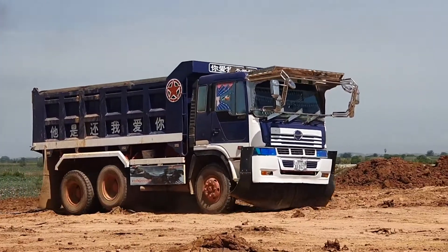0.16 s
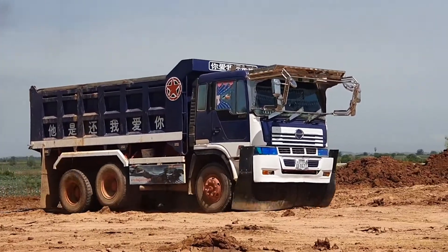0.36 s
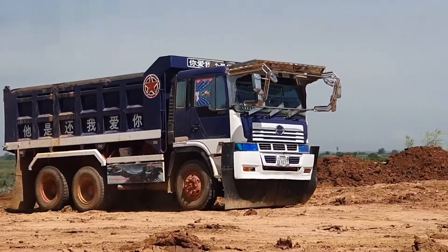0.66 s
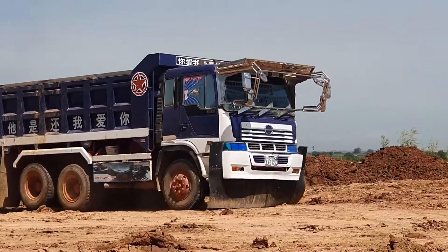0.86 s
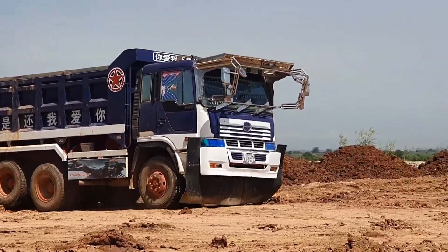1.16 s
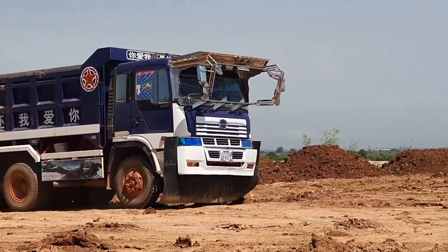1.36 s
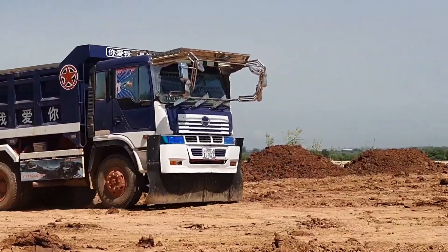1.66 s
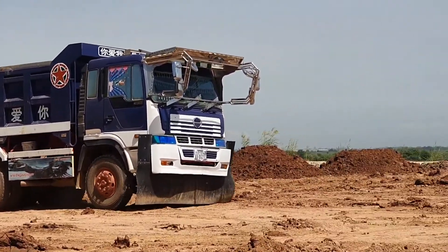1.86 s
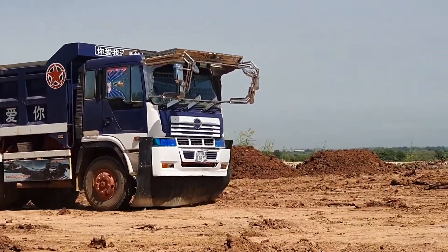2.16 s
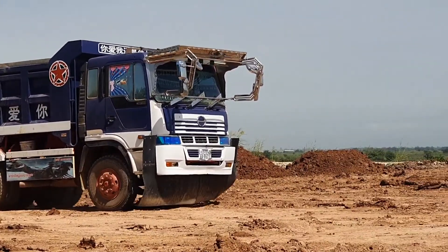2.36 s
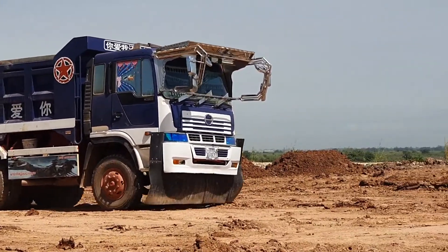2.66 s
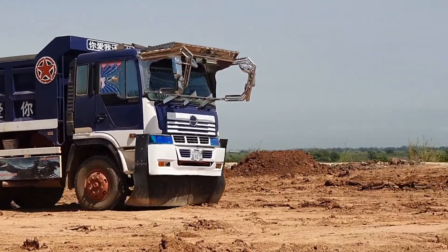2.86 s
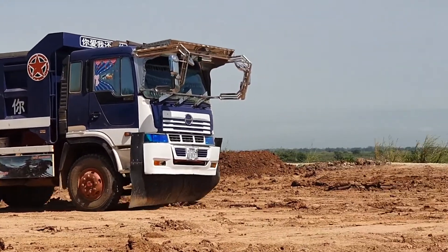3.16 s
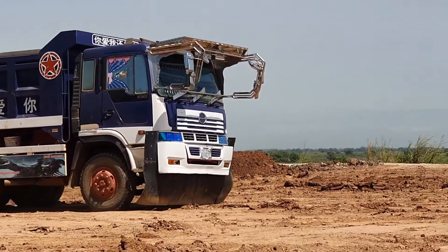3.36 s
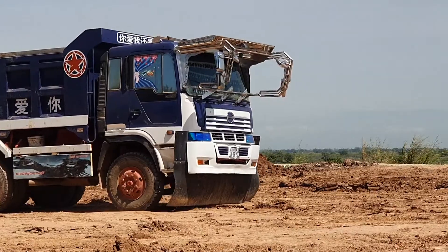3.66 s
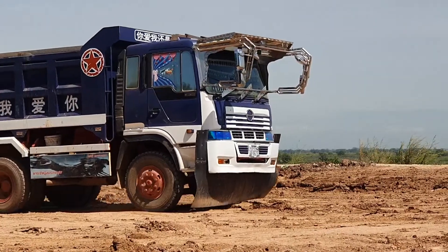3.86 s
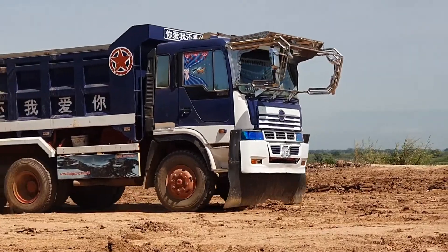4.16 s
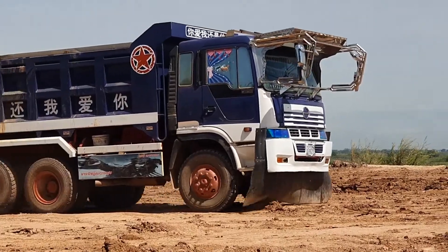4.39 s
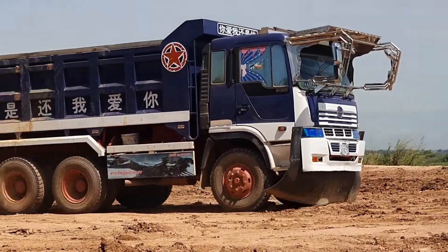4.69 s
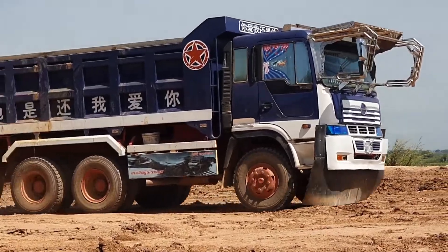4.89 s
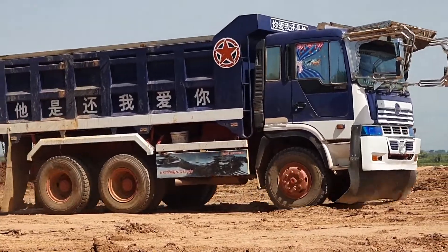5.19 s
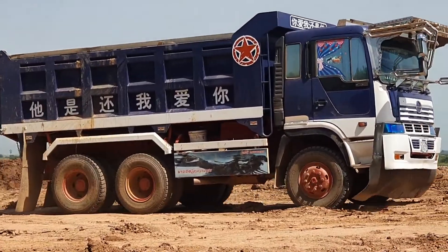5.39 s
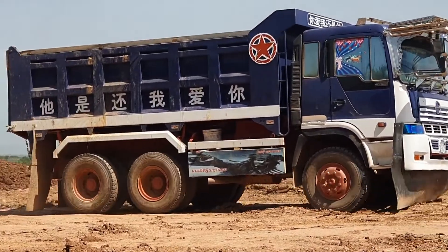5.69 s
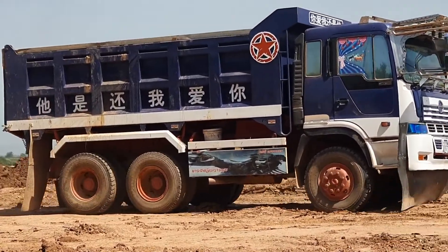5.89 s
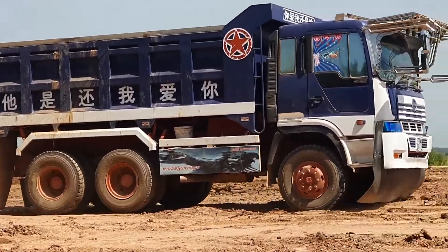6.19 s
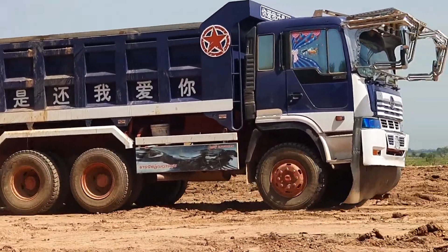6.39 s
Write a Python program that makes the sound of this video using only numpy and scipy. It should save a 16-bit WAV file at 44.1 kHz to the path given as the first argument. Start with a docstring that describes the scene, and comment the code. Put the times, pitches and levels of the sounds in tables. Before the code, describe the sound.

Outdoors on open dirt, two close microphones pick up heavy diesel machinery without noticeable echo. From 0 to about 3.9 s a bulldozer on the left drones under load, a strong, low, nearly steady hum wrapped in rough exhaust roar, mid-range clatter and soft fan hiss. Thin metallic track squeaks chirp near the start, then around 1.8-3 s, with a few knocks from 2.4 s. A dump truck's quieter low-gear growl wavers underneath, gradually rising and gaining a faint gear whine after 3 s. Near 4 s the bulldozer's throttle closes amid bright squeaks and a knock; its hum drops and slides down, with a faint falling whine, leaving the truck's lumpy, loping exhaust clearer. Drawn-out squeaks come near 4.7 s. About 5.6 s the bulldozer catches and revs upward, its drone returning by 6.3 s beside final squeaks, with both engines still running at the end.

```python
"""A six-cylinder bulldozer drones under load to the left, shuts its throttle, coasts and revs again.
Its exhaust is a strong firing tone with weak cycle tones; its track links squeak (stick-slip tones) and knock
(noise bursts). An eight-cylinder dump truck crawls closer over dirt in low gear: loping cycle tones, whining gears.
Pulsed noise, with brief narrow-band flecks, gives both machines their roar, clatter and fan hiss.
Two microphone ports hear slight time differences."""
import sys
import numpy as np
from scipy import signal
from scipy.fft import rfft, irfft, next_fast_len
from scipy.io import wavfile
from scipy.ndimage import uniform_filter1d, map_coordinates

SR = 44100
rng = np.random.default_rng(int(sys.argv[2]) if len(sys.argv) > 2 else 0)


def log_audio(samples):
    """Write samples as a 16-bit WAV file to the path given in sys.argv[1]."""
    # one column per channel
    frames = np.atleast_2d(samples).T
    # limit to full scale, then quantise
    limited = np.clip(frames, -1, 1)
    pcm = np.round(limited * 32767).astype(np.int16)
    wavfile.write(sys.argv[1], SR, pcm)


N = 288414


def amp(db):
    """Amplitude factor of a level in dB."""
    return 10 ** (np.asarray(db) / 20)


def unit(x):
    """x scaled to rms 1."""
    return x / np.sqrt(np.mean(x ** 2) + 1e-20)


def along(points, hz):
    """Interpolates (Hz, value) points on a log frequency axis."""
    point_hz, values = np.transpose(points)
    return np.interp(np.log(hz + 1), np.log(point_hz + 1), values)


def curves(rows):
    """One value per sample for each column after the time in seconds."""
    s, *columns = np.transpose(rows)
    return [np.interp(np.arange(N) / SR, s, column) for column in columns]


def wobble(knots_per_s):
    """A smooth random curve through normally distributed knots."""
    knots = rng.standard_normal(int(N * knots_per_s / SR) + 4)
    return map_coordinates(knots, [np.arange(N) * knots_per_s / SR])


def filtered(x, response):
    """x with its spectrum multiplied by a response of frequency."""
    m = next_fast_len(N + 8192)
    return irfft(rfft(x, m) * response(np.fft.rfftfreq(m, 1 / SR)), m)[..., :N]


def tone(phase, db, waver_db, knots_per_s, scatter_rad=np.pi):
    """A sine of rms level db wavering in size, its start phase scattered by about scatter_rad."""
    level = np.sqrt(2) * amp(db + waver_db * wobble(knots_per_s))
    return level * np.cos(phase + scatter_rad * rng.uniform(-1.04, 1))


def turning(firing_hz, cylinders):
    """Phase of the four-stroke cycle, in which each cylinder fires once."""
    return 2 * np.pi * np.cumsum(firing_hz) / SR / cylinders


def scratch(hz, half_width_octaves, size):
    """Short noise of rms 1 in a band around hz."""
    low_hz = hz / 2 ** half_width_octaves
    high_hz = min(hz * 2 ** half_width_octaves, SR / 2.2)
    band = signal.butter(2, [low_hz, high_hz], "bandpass", fs=SR)
    return unit(signal.lfilter(*band, rng.standard_normal(size)))


def heard(x, lead_s):
    """Both ports, the left one earlier by lead_s."""
    n = np.arange(N)
    return np.array([map_coordinates(x, [n + side * lead_s * SR / 2], mode="nearest") for side in (1, -1)])


def dozer_exhaust():
    """Regular firing gives a strong tone and its octave, unequal cylinders weak cycle tones; a whine shows on coasting."""
    # Held by the governor, throttle shut, coasting, revving. Each row: time in s, firing rate in Hz, firing tone in dB
    throttle = [(0.0, 83.44, -16), (0.6, 84.3, -17), (0.95, 82.85, -16), (1.8, 82.57, -16),
                (2.05, 84.2, -15.5), (2.3, 83.15, -16.5), (3.0, 84.2, -16.5), (3.3, 86.1, -16.8),
                (3.62, 85.7, -18), (3.87, 84.32, -19.5), (3.97, 83.06, -33), (4.1, 77.9, -42),
                (4.6, 64.2, -60), (5.2, 49.6, -52), (5.58, 40.85, -40), (5.68, 43.9, -26.5),
                (5.83, 52.2, -22.5), (6.14, 67.75, -22), (6.28, 72.94, -16), (6.54, 80.5, -18)]
    # Tones from unequal cylinders. Each row: multiple of the cycle rate, level in dB re firing tone
    orders = [(5, -52), (7, -44), (8, -23.5), (10, -31), (14, -25), (15, -34.5), (16, -26.5), (17, -29),
              (18, -22.5), (20, -41), (22, -34)]
    # The pipe favours a low octave. Each row: octave frequency in Hz, level in dB re firing tone
    octave = [(80, -4), (122, -3.5), (134, -24), (155, -36), (165, -20)]
    # Whine, heard only while coasting. Each row: time in s, level in dB
    rundown = [(4.0, -85), (4.12, -63), (4.55, -65), (4.67, -52), (4.85, -61), (5.0, -55), (5.15, -62),
               (5.3, -90)]
    whine_per_firing = 20.6  # pitch ratio

    hz, db = curves(throttle)
    cycle = turning(hz, cylinders=6)
    # gaining speed takes more fuel, which sharpens the exhaust pulses
    gain_hz_per_s = uniform_filter1d(np.gradient(hz) * SR, size=4000)
    strain_db = 0.13 * np.clip(gain_hz_per_s - 8, 0, 60)
    firing = tone(6 * cycle, db, 0.21, 13)
    overtones = tone(12 * cycle, db + along(octave, 2 * hz), 2.65, 5)
    overtones += sum(tone(k * cycle, db + level_db + strain_db, 0.93, 4.04) for k, level_db in orders)
    whine_db, = curves(rundown)
    whine_hz = whine_per_firing * hz + 4 * wobble(30)
    whine = tone(2 * np.pi * np.cumsum(whine_hz) / SR, whine_db, 2, 12)
    return firing, overtones, whine, cycle


def truck_exhaust():
    """The firing tone beats against cycle tones of uneven banks, a lope; two gear pairs whine unsteadily."""
    # Surging over ruts. Each row: time in s, firing rate in Hz, firing tone in dB
    surging = [(0.0, 52.4, -48.5), (0.3, 53.4, -33), (0.64, 50, -37), (0.9, 57, -29), (1.15, 51.5, -36),
               (1.55, 52.3, -33.5), (1.8, 55, -30.5), (2.25, 53.6, -29), (2.56, 63.07, -28.5),
               (2.88, 57.46, -31), (3.25, 66, -27.5), (3.6, 65.53, -29), (4.0, 69.34, -27.5),
               (4.2, 66.86, -29), (4.55, 71.1, -26), (4.82, 66.94, -27), (5.15, 71.46, -24),
               (5.55, 67.47, -23.5), (5.9, 65.32, -24), (6.2, 65.1, -26), (6.54, 60.73, -29.5)]
    # Uneven exhaust banks. Each row: multiple of the cycle rate, level in dB re firing tone before the lope
    orders = [(4, -18), (5, -9), (6, -6), (7, 0), (9, -14), (10, -10), (11, -6), (13, -5), (14, -3),
              (15, -10), (16, -9), (17, -12), (20, -12), (24, -14), (26, -14), (29, -13), (34, -14),
              (40, -16)]
    # The lope deepens as the truck pulls harder. Each row: time in s, mean gain of the cycle tones in dB
    lope = [(0, -22), (1.5, -24), (3.8, -7), (5, -8.5), (6.54, -7)]
    mesh_per_firing, second_pair_ratio = 66.3, 1.325  # pitch ratios
    gear_db, gear_full_s, gear_rise_db_per_s = -63, 3.2, 40

    hz, db = curves(surging)
    lope_db = curves(lope)[0] + 1.94 * wobble(5)
    cycle = turning(hz, cylinders=8)
    exhaust = tone(8 * cycle, db, 1.7, 6, scatter_rad=0)
    for k, level_db in orders:
        # one firing of each cycle is stronger, so the low cycle tones crest together in a lump
        scatter_rad = np.pi if k > 7 else .3
        exhaust += tone(k * cycle, db + lope_db + level_db, .8, 4, scatter_rad)
    whine_db = gear_db - gear_rise_db_per_s * np.clip(gear_full_s - np.arange(N) / SR, 0, 1)
    mesh = mesh_per_firing * 8 * cycle
    gears = tone(mesh + 1.1 * wobble(160), whine_db, 3.5, 30)
    gears += tone(second_pair_ratio * mesh + 1.4 * wobble(160), whine_db - 5, 3.5, 30)
    return exhaust, gears, cycle


def squeak(length_s, hz, beside_db):
    """A track link slipping on its pin: a ragged stick-slip tone, overtones, shoe modes and a scrape."""
    # What a pitch brings along. Each row: pitch in Hz, 2nd and 3rd harmonic in dB, flatness at the start in Hz
    pins = [(3400, -26, -29, 120), (3600, -23, -34, 30), (4300, -22, -33, 30), (5090, -2.5, -26, 0),
            (5170, -17, -15, 0), (5660, -11, -35.5, 40)]
    # Modes of the track shoe beside the pin's. Each row: offset in Hz, relative level in dB
    neighbours = [(-480, -17.5), (479, 9.5), (892, -5.5)]
    scoop_s = .012  # time constant of the slide up to pitch

    pin_hz, *extras = np.transpose(pins)
    second_db, third_db, scoop_hz = (np.interp(hz, pin_hz, column) for column in extras)
    t = np.arange(int(SR * (length_s + 0.056))) / SR
    steps = np.repeat(rng.standard_normal((5, 80)), 85, axis=1)
    flutter = uniform_filter1d(steps, size=85, axis=1)[:, :len(t)]
    pitch_hz = hz - scoop_hz * np.exp(-t / scoop_s) + 28 * flutter[0]
    phase = 2 * np.pi * np.cumsum(pitch_hz) / SR
    swell = np.sin(np.pi * np.clip(t / length_s, 0, .85)) ** .7
    shape = swell * amp(-60 * np.clip(t - 0.85 * length_s, 0, 1) / .055)
    grip = amp(3.5 * flutter[1:] - 1.5)  # comes and goes within milliseconds
    overtones = amp(second_db) * np.sin(2 * phase) + amp(third_db) * np.sin(3 * phase)
    wave = grip[0] * (np.sin(phase) + shape * overtones)
    for own_grip, (offset_hz, level_db) in zip(grip[1:], neighbours):
        # each mode catches only for part of the slip
        catch_db = 3 - 14 * (2 * t / length_s - 2 * rng.random()) ** 2
        mode = np.sin(phase + 2 * np.pi * offset_hz * t)
        wave += own_grip * amp(beside_db + level_db + catch_db) * mode
    wave += amp(-23) * scratch(hz, 0.11, size=len(t))
    wave += amp(-11.5 - 60 * t / 0.099) * scratch(hz, 0.41, size=len(t))
    return shape * wave


def noise_burst(db, hz, half_width_octaves):
    """A noise band with a 2.3 ms attack, falling 60 dB in 0.14 s, cut at 0.1 s."""
    t = np.arange(SR // 10) / SR
    envelope = amp(db - 60 * t / 0.14) * np.clip(t / 0.0023, 0, 1)
    return envelope * scratch(hz, half_width_octaves, size=len(t))


def tracks_and_flecks():
    """Track links squeak on their pins and knock in wide noise bands; narrow bands fleck the machine noise."""
    # Each row: start in s, length in s, pitch in Hz, level in dB, neighbour modes in dB, left over right in dB
    squeaks = [(0.048, 0.05, 4480, -49, -30, 5), (0.1, 0.051, 3430, -43.5, -30, 0),
               (0.348, 0.036, 5080, -47, -30, 0), (1.792, .035, 4114, -45, -30, 0),
               (2.003, 0.03, 3900, -41.5, -30, 0), (2.487, .03, 4200, -40, -30, 0.5),
               (2.597, .012, 3820, -42, -30, 3), (2.617, 0.029, 5224, -31, -30, -2),
               (2.65, 0.04, 5200, -47, -27, -1), (2.718, 0.042, 5160, -36.5, -30, 0),
               (2.744, 0.051, 5070, -40, -30, 5), (2.796, 0.026, 5430, -50, -30, 5),
               (2.95, 0.032, 5194, -34.5, -30, 2), (3.993, 0.016, 5221, -29.5, -30, 4),
               (4.008, .028, 5140, -37, -30, 6), (4.045, 0.038, 5550, -37.5, -30, 2),
               (4.078, .028, 5565, -49, -30, 1), (4.433, .025, 4070, -37, -30, 3),
               (4.638, 0.045, 3320, -32, -8, 3), (4.707, .08, 3320, -29.5, -10, 1.5),
               (4.805, .02, 3340, -45, -5, 4), (5.304, 0.049, 2680, -50, -30, 0),
               (6.085, 0.023, 3970, -41, -30, 0), (6.243, .022, 3660, -36, -30, -3),
               (6.27, 0.039, 4238, -50, -30, -3), (6.343, 0.039, 3675, -39, -30, -3),
               (6.372, 0.046, 3280, -30, -25, -5.5), (6.436, .075, 3190, -38, -8, -3)]
    # Track links knocking. Each row: start in s, level in dB, centre in Hz
    knocks = [(2.425, -38, 2561), (2.598, -40, 4030), (2.625, -50, 11000), (2.962, -50, 5500),
              (3.845, -36, 3180), (4.013, -33.5, 2690), (4.438, -39.5, 3440), (4.949, -47, 2495),
              (5.515, -42, 2002)]
    # Brief narrow-band flecks in the machine noise. Each row: start in s, level in dB, centre in Hz
    flecks = [(0.571, -43, 1670), (1.77, -40, 2540), (1.80, -41, 1020), (1.934, -38, 1520),
              (2.39, -45, 1505), (4.03, -42, 6484), (6.2, -43, 1137)]

    ports = np.zeros((2, N + SR))
    for s, length_s, hz, db, beside_db, pan_db in squeaks:
        wave = squeak(length_s, hz, beside_db)
        port_gain = np.sqrt(2) * amp(db + np.array([[pan_db], [-pan_db]]) / 2)
        ports[:, round(s * SR):][:, :len(wave)] += port_gain * wave
    for rows, half_width_octaves in ((knocks, 0.49), (flecks, .09)):
        for s, db, hz in rows:
            burst = noise_burst(db, hz, half_width_octaves)
            ports[:, round(s * SR):][:, :len(burst)] += burst
    return ports[:, :N]


def rush(spectrum, patchy_db, beat, panels):
    """Noise of rms 1 with patches of random gain, pulsed by beat, coloured by panel resonances and dips."""
    z = signal.stft(rng.standard_normal(N) * beat, nperseg=512)[2]
    patches = uniform_filter1d(rng.standard_normal(z.shape), size=4, axis=0)
    patches = uniform_filter1d(patches, size=10, axis=1)
    x = signal.istft(z * amp(patchy_db * unit(patches)), nperseg=512)[1][:N]

    def colour(hz):
        """Broad spectrum plus a bell curve per panel."""
        bumps_db = sum(db / (1 + (2 * (hz - centre) / width) ** 2) for centre, width, db in panels)
        return amp(along(spectrum, hz) + bumps_db)

    return unit(filtered(x, colour))


def machine_noise(spectrum, dozer, truck, truck_share, lead_s, diffuse, patchy_db):
    """Noise from each machine (beat, panels), plus a ground-scattered part, with the dozer's beat, unlike per port."""
    direct = np.sqrt(1 - truck_share) * heard(rush(spectrum, patchy_db, *dozer), lead_s)
    direct += np.sqrt(truck_share) * heard(rush(spectrum, patchy_db, *truck), .00002)
    scattered = np.array([rush(spectrum, patchy_db, *dozer) for port in range(2)])
    return np.sqrt(1 - diffuse) * direct + np.sqrt(diffuse) * scattered


def noise_layers(dozer_cycle, truck_cycle, lead_s):
    """Exhaust roar, engine clatter and fan hiss, pulsed by the firings of both engines."""
    # Each row: time in s, exhaust roar in dB, engine clatter in dB, fan hiss in dB
    levels = [(0.0, -28.5, -39.5, -54), (1.0, -29.5, -39.5, -56.5), (1.6, -31, -40, -57),
              (2.5, -31, -40, -53), (3.0, -32.5, -40, -54.5), (3.6, -31.5, -39, -53),
              (4.2, -32, -39.5, -57), (4.85, -34.5, -41.5, -54.5), (5.3, -31.5, -40, -54),
              (6.1, -31, -38.5, -52.5), (6.54, -33.5, -38.5, -50)]
    # Spectra of roar, clatter and hiss. Each row: frequency in Hz, relative density in dB per Hz
    exhaust = [(20, -37), (40, -10), (70, -4), (110, -3), (170, -5), (260, -9), (400, -13.5), (600, -18),
               (800, -28.5), (1500, -52.5)]
    block = [(300, -19.5), (700, 2), (1100, -0.5), (1400, -2), (2000, -4), (2700, -5.5), (3400, -7.5),
             (4200, -11), (5500, -13.5), (7000, -27.5), (9000, -44), (16000, -50.5)]
    fans = [(3000, -34.5), (6000, -0.5), (8200, -7.5), (10000, -4.5), (11800, -1.5), (13500, -5),
            (15700, -12.5)]
    # Engine panels and the dips between them. Each row: centre in Hz, width in Hz, gain in dB
    dozer_panels = [(252, 150, 2), (448, 73, 4), (750, 110, -2.5), (1040, 670, 2), (1274, 33, 4),
                    (1386, 95, 0.5), (1870, 170, 6.5), (2460, 140, 5.5), (3310, 220, 3), (3780, 150, 0.5),
                    (4460, 180, 2.5), (5060, 250, -4)]
    truck_panels = [(438, 62, 4), (630, 74, 8), (747, 130, -9.5), (1150, 120, 3), (1320, 120, -9.5),
                    (1560, 210, 4.5), (1975, 110, 4.5), (2430, 180, 1), (3100, 160, 0.5), (3800, 150, 0.5)]
    mid_share, nearing_per_s = 0.27, 0.06  # truck's part of the direct noise power at mid scene, and its growth

    roar_db, clatter_db, hiss_db = curves(levels)
    truck_share = np.clip(mid_share + nearing_per_s * (np.arange(N) - N / 2) / SR, .02, 1)
    # each firing pulses the noise; alternate firings differ
    dozer_beat = 1 + .08 * np.cos(6 * dozer_cycle) + .09 * np.cos(3 * dozer_cycle)
    truck_beat = 1 + 0.13 * np.cos(8 * truck_cycle) + 0.13 * np.cos(4 * truck_cycle)
    shared = (dozer_beat, dozer_panels), (truck_beat, truck_panels), truck_share, lead_s
    surge = wobble(9)
    roar = amp(roar_db) * machine_noise(exhaust, *shared, diffuse=.025, patchy_db=0.37)
    clatter = amp(clatter_db + 0.23 * surge) * machine_noise(block, *shared, diffuse=0.2, patchy_db=1.6)
    hiss = amp(hiss_db + .7 * surge) * machine_noise(fans, *shared, diffuse=0.86, patchy_db=3.0)
    return roar + clatter + hiss


def scene():
    """Places every source at the two ports by its arrival times and sums them."""
    # Each row: time in s, lead of the left port for the bulldozer in s
    lead = [(0, 0.00022), (1.5, 0.0003), (3.0, 0.000361), (4.5, 0.000396), (6.54, 0.00043)]
    lead_s, = curves(lead)
    firing, overtones, whine, dozer_cycle = dozer_exhaust()
    truck, gears, truck_cycle = truck_exhaust()
    # long waves bend round the body between the ports, so these seem further apart
    engines = heard(firing, 1.94 * lead_s) + heard(overtones, lead_s) + heard(truck, 0.00022)
    engines += gears + whine  # the whines reach both ports together
    left, right = tracks_and_flecks()
    short_sounds = np.array([heard(left, lead_s)[0], heard(right, lead_s)[1]])
    return engines + short_sounds + noise_layers(dozer_cycle, truck_cycle, lead_s)


def record(dry):
    """The ports differ a little in colour; nothing is kept above the band limit."""
    # Each row: frequency in Hz, left over right port in dB
    ports = [(60, .6), (300, 1.4), (500, .5), (1000, 2.2), (3000, 2.2), (5000, 1), (10500, -.5), (13000, 2),
             (15500, 5)]
    top_hz = 15750
    return filtered(dry, lambda hz: amp(np.outer([1, -1], along(ports, hz)) / 2) * (hz < top_hz))


dry = scene()
out = record(dry)
log_audio(out)
```